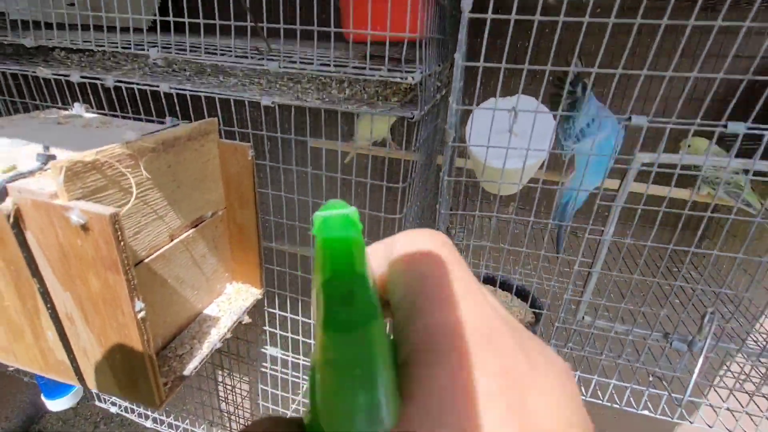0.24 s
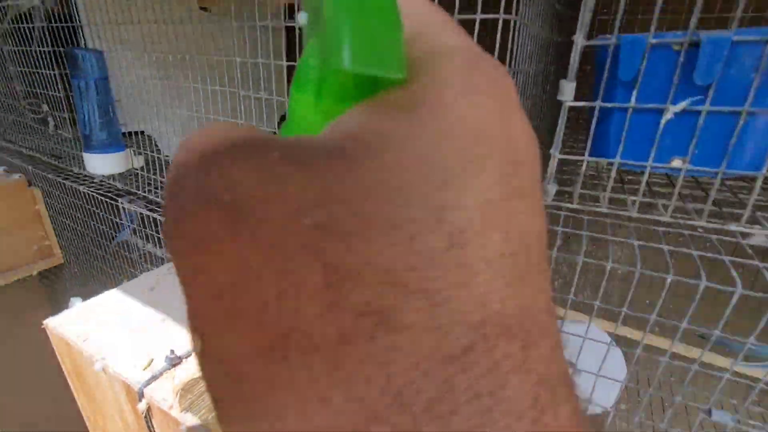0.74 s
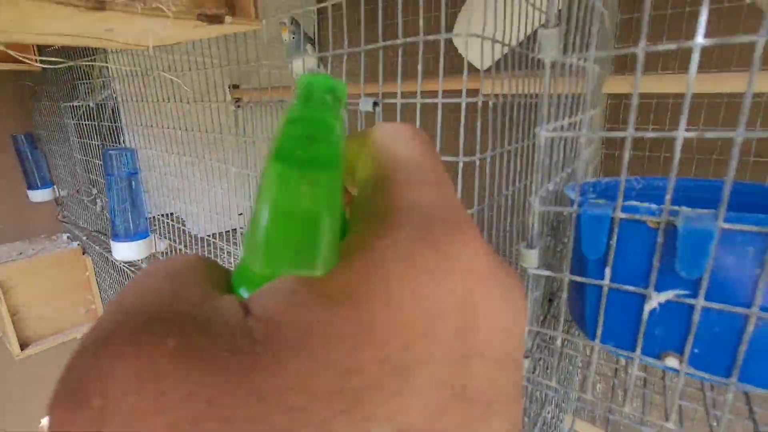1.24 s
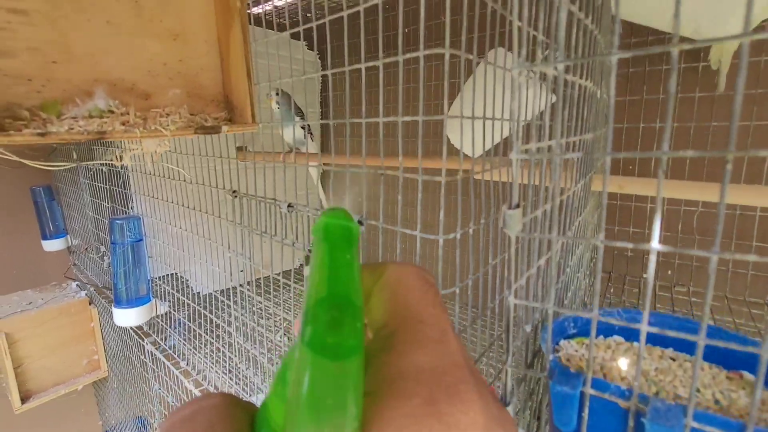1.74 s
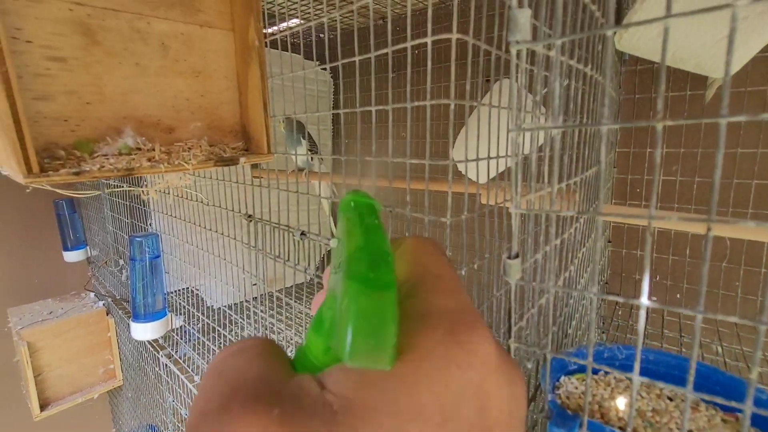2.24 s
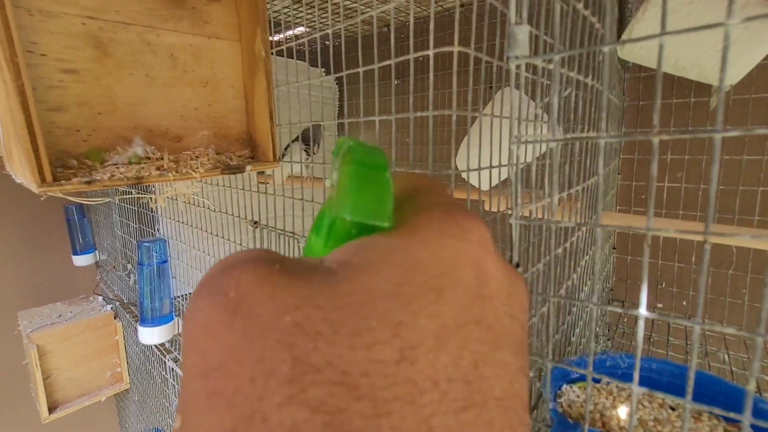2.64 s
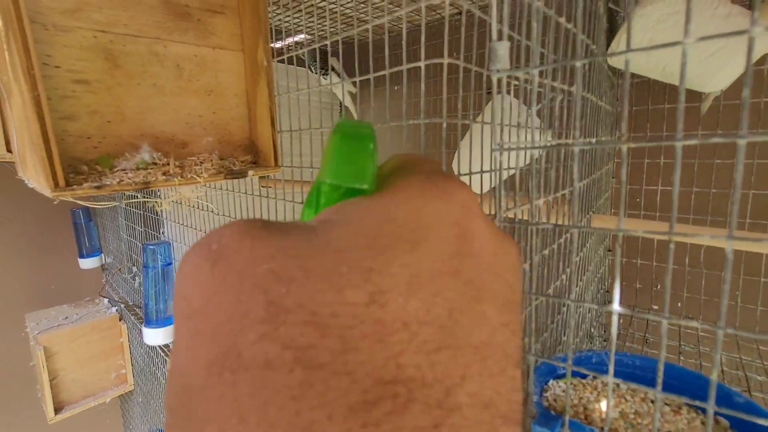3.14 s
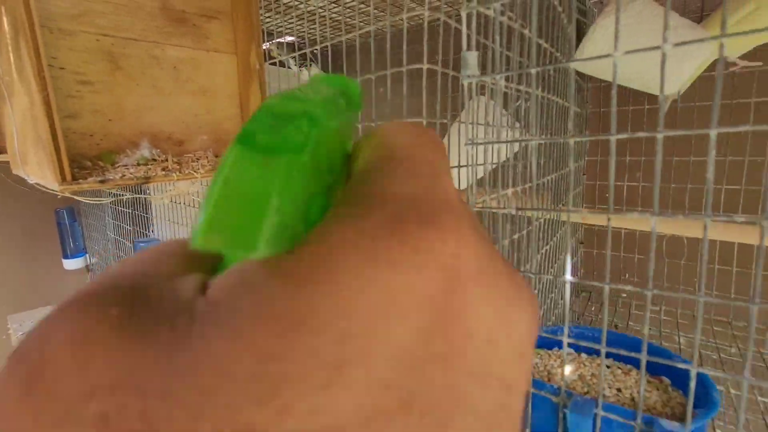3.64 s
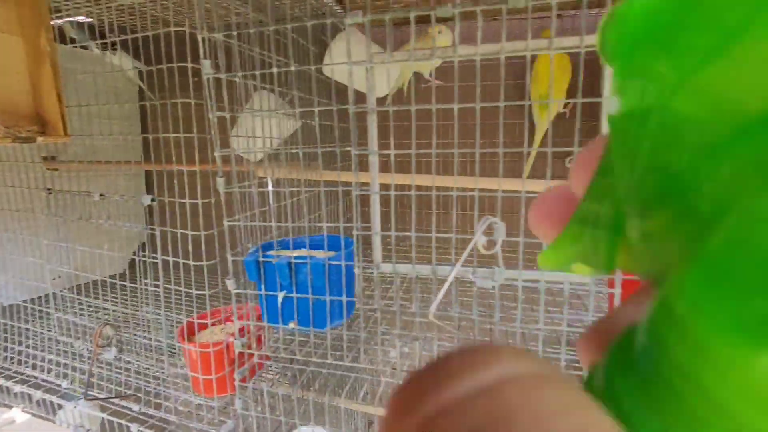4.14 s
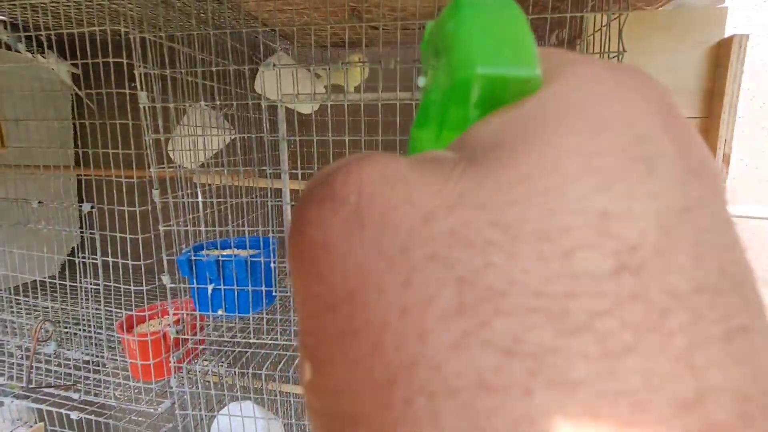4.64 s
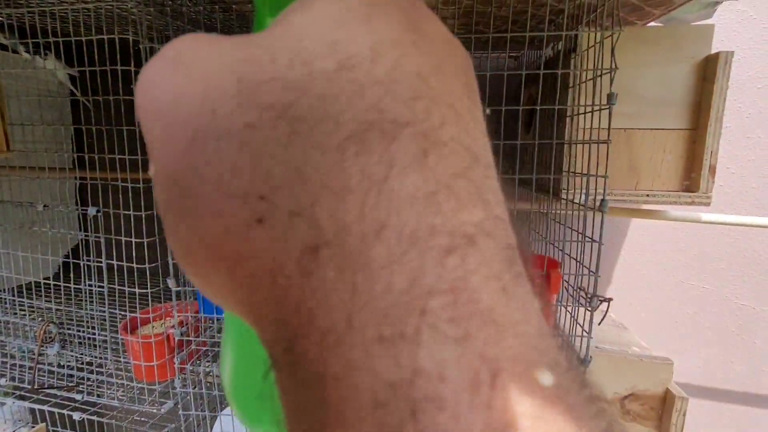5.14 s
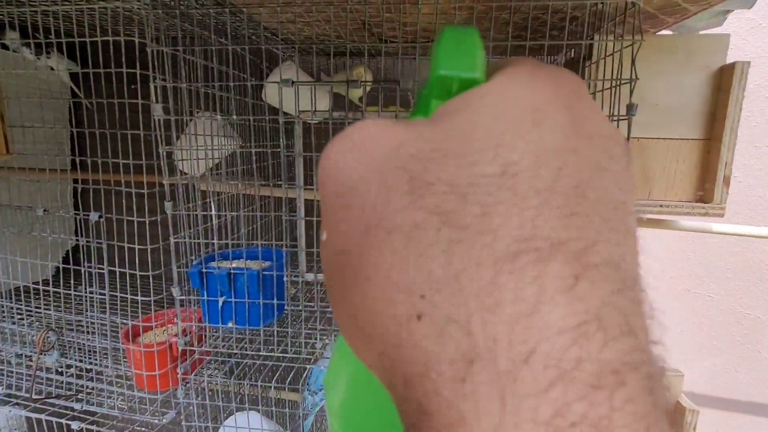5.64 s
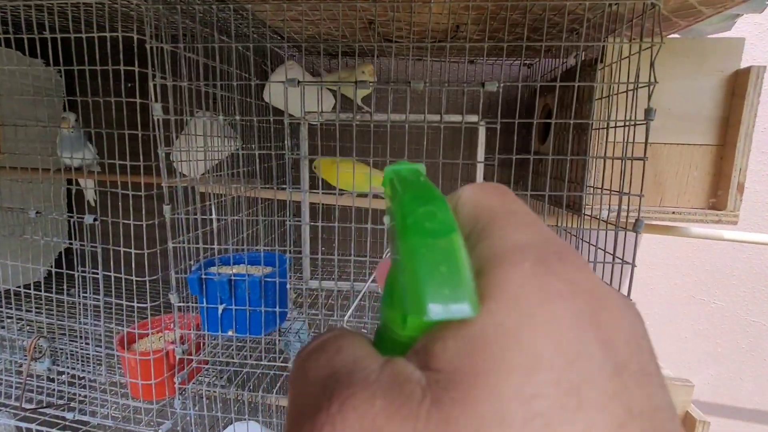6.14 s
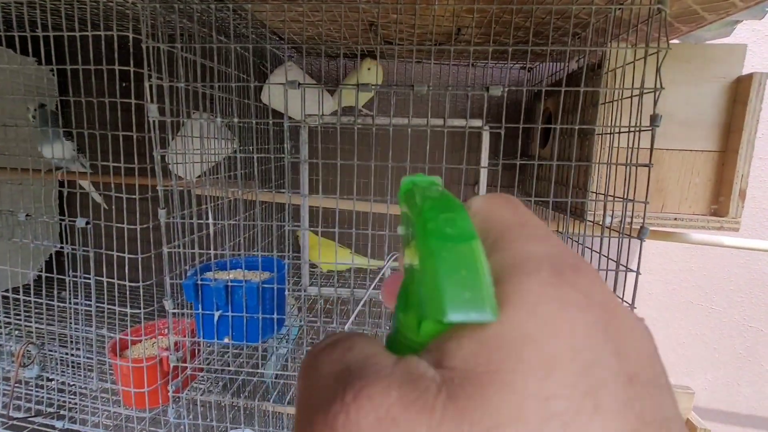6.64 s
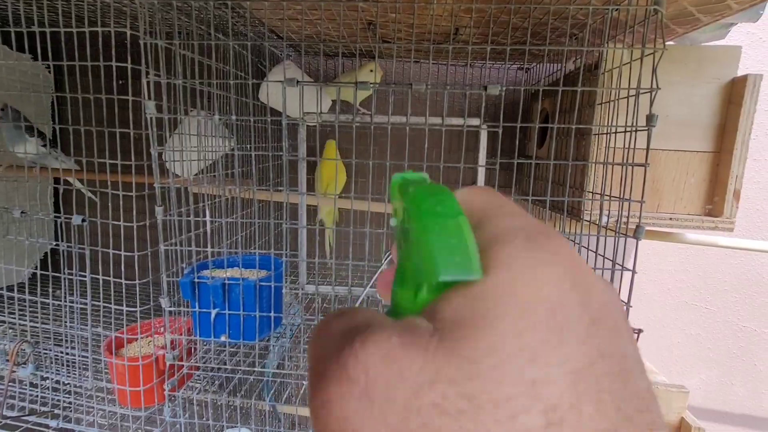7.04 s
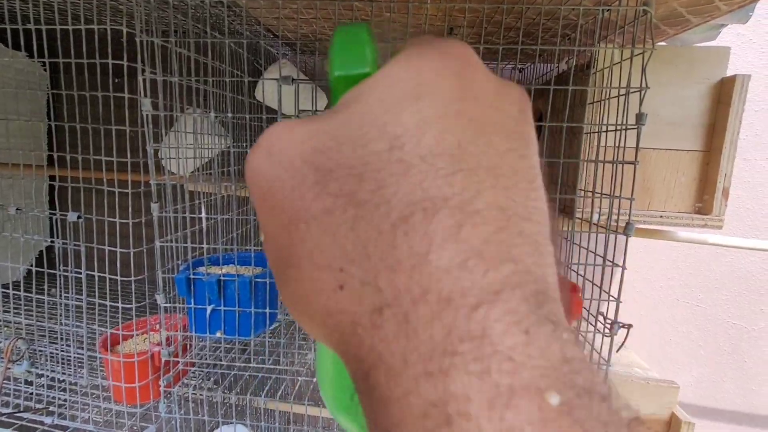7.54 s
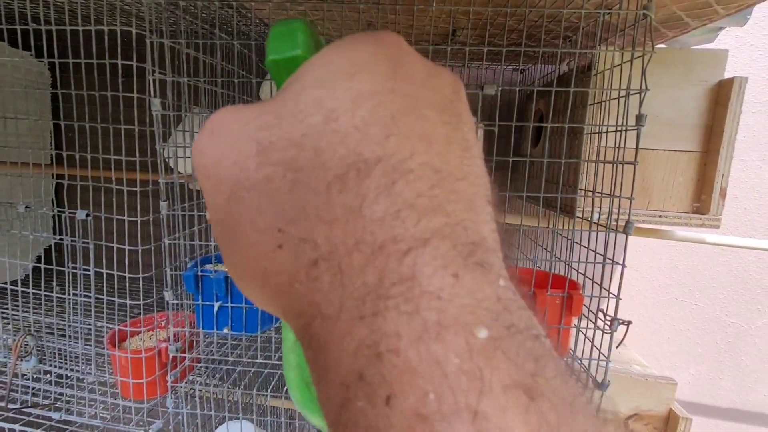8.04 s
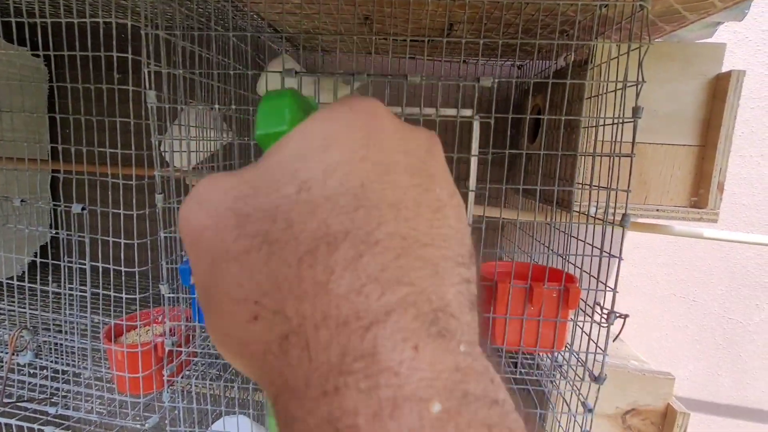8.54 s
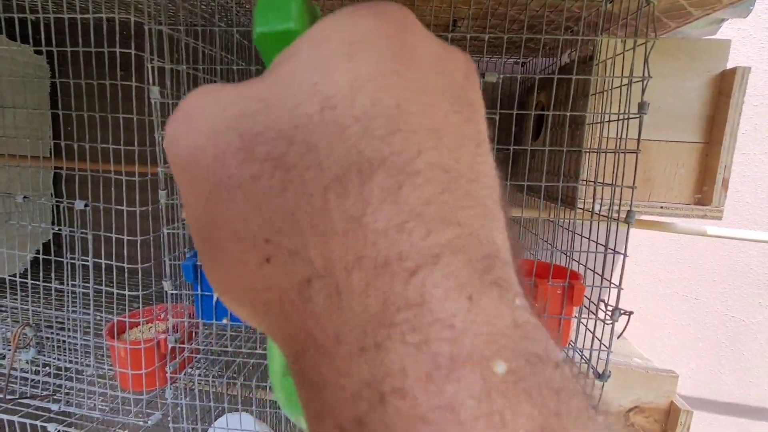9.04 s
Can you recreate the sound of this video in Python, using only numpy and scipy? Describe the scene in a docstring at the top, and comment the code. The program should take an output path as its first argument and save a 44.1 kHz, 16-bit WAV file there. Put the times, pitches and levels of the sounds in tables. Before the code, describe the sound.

Short sharp mist bursts and plastic ticks repeat close by, over budgerigar chirps near and far, soft wing flurries and faint outdoor air.

```python
"""A hand pumps a trigger spray bottle close by in an aviary: shaped noise for each squeeze hisses out mist,
then the trigger springs back and ticks, as short bright bursts of decaying noise.
Small parrots warble in quick stepped notes, sine whistles with a weak octave; farther ones blur in the shed's echo.
Wing flurries push air at the two microphone ports, as pulsing low noise, over open air whose treble wavers."""
import sys
import numpy as np
from scipy import signal
from scipy.fft import rfft, irfft, next_fast_len
from scipy.io import wavfile
from scipy.ndimage import uniform_filter1d, map_coordinates

SR = 44100
rng = np.random.default_rng(int(sys.argv[2]) if len(sys.argv) > 2 else 0)


def makeup_ratio(level_db):
    """Linear amplitude ratio for a level in decibels (20 dB per factor of ten)."""
    decades = np.asarray(level_db, float) / 20
    return 10 ** decades


def wav_out(sig):
    """Save sig, one row per channel (or a flat mono array), as 16-bit PCM at SR to the path in sys.argv[1]."""
    wavfile.write(sys.argv[1], SR, np.round(np.clip(np.atleast_2d(sig).T, -1, 1) * 32767).astype(np.int16))


N = 409688  # length in samples

# Squeezes of the trigger. Each row: start in seconds, trigger back on its stop in seconds,
# level of the tick's noise in dB before its resonance.
SQUEEZES = [(0.054, 0.364, -36), (0.966, 1.352, -34), (1.443, 1.83, -37), (1.912, 2.313, -30),
            (2.389, 2.737, -29), (2.799, 3.152, -32), (3.21, 3.542, -31), (3.607, 3.895, -35),
            (4.578, 4.905, -30), (5.009, 5.323, -32), (5.382, 5.724, -33), (5.796, 6.121, -35),
            (6.466, 6.834, -25), (6.889, 7.206, -38), (7.282, 7.6, -31), (7.666, 7.954, -33),
            (8.005, 8.294, -27), (8.33, 8.621, -26), (8.66, 8.959, -33), (9.009, 9.308, -33)]
# Spectrum of the mist. Each row: frequency in Hz, gain in dB.
MIST_SPECTRUM = [(1000, -22), (2500, -3.5), (8500, -13), (12000, -8), (16000, -12.5)]
# Nozzle resonance as the bottle is aimed about. Each row: time in seconds, level in dB re the hiss.
NOZZLE_LEVEL = [(.1, 4.5), (1.4, -1.5), (2.9, 2), (5.8, 4.5), (7.7, 3), (8.3, -1)]
HISS_DB = -31  # level of the mist from 9 to 15 kHz, before the squeeze's shape and the ports
RETURN_S = 0.12  # the spring brings the trigger back about this long after the valve shuts


def spray():
    """Turbulent jet noise: pressure swells the mist's hiss and nozzle ring while water rushes through the valve."""
    jet_level, nozzle_level, valve_level = np.zeros((3, N))
    for start_s, back_s, _ in SQUEEZES:
        length_s = back_s - RETURN_S - start_s
        k, shape = swell(start_s - .04, length_s + 0.069, sharp=2.2)
        jet_level[k] += makeup_ratio(HISS_DB) * shape
        nozzle_level[k] += makeup_ratio(HISS_DB + np.interp(start_s, *np.transpose(NOZZLE_LEVEL))) * shape
        # the valve opens and shuts quickly
        k, shape = swell(start_s - .005, length_s + 0.004, sharp=0.4)
        valve_level[k] += makeup_ratio(HISS_DB - 5.5) * shape
    drops = patchy(patch_db=2.0) * makeup_ratio(0.79 * wobble(300))  # droplets tear off unevenly
    mist = filtered(drops, lambda hz: makeup_ratio(along(MIST_SPECTRUM, hz)))
    mist = mist / np.std(filtered(mist[0], lambda hz: (hz > 9000) & (hz < 15000)))
    ring = unit(filtered(drops, lambda hz: peak(hz, 5320, 3850) ** 2))
    rush = unit(filtered(drops, lambda hz: peak(hz, 1480, 1170) + peak(hz, 2800, 3000) ** 2))
    flow = mist * jet_level + ring * nozzle_level + rush * valve_level
    return ports(*flow, lag_ms=0.2915)


GRIP_S, GRIP_DB = .014, -35  # the trigger clicks this long before the start as the finger takes up the slack
RATTLE_S, RATTLE_DB = 0.09, -4  # mean time before the stop, mean level re the tick


def ticks():
    """Impact excitation: the gripped trigger clicks; let go, the valve ball rattles and the trigger hits its stop."""
    out = np.zeros((2, N + SR))
    t = np.arange(SR // 50) / SR
    for start_s, back_s, db in SQUEEZES:
        timing, size = rng.uniform(-1, 1, 2)
        grip = (start_s - GRIP_S, GRIP_DB - 3 * size)
        rattle = (back_s - RATTLE_S * (1 + .1 * timing), db + RATTLE_DB + 3 * size)
        stop = (back_s, db)
        for s, crack_db in (stop, rattle, grip):
            first = round(s * SR)
            decay = makeup_ratio(crack_db - 60 * t / .014)  # falls 60 dB in 14 ms
            out[:, first:first + len(t)] += decay * rng.standard_normal((2, len(t)))
    return makeup_ratio([[-1.5], [1.5]]) * filtered(out[:, :N], lambda hz: peak(hz, 8000, 10000))


# Near birds' calls, each one whistle that steps from pitch to pitch. Each row: list of starts in seconds,
# list of notes (onset in ms into the call, nominal pitch in Hz, level in dB before tremor and port gains),
# end in ms into the call, share of the way that a note slides toward a lower next one.
CALLS = [([.083], [(13, 3740, -20), (35.96, 3000, -14), (46.1, 3650, -14), (79, 3140, -6.5),
         (92, 3490, -11), (115, 2510, -24), (147, 2040, -21), (158.2, 3500, -7.5), (174, 3100, -9)],
         184, .35), ([1.666], [(10, 3560, -12.5), (26.07, 2700, -19), (43.1, 3520, -10), (54, 2200, -17),
         (69.3, 3080, -7), (83, 3200, -8), (112, 2330, -21), (129, 2130, -21.5), (155.7, 3520, -11),
         (168, 3200, -17)], 181, .2), ([2.13], [(20, 3700, -27), (57, 1840, -20), (70, 3100, -25),
         (90.5, 3400, -14), (107, 2400, -15.5), (125.8, 1900, -15), (133.5, 3450, -17.5), (146, 2200, -23)],
         158, .3), ([3.08], [(6, 3950, -18), (17, 3700, -16.5), (29, 3000, -14.5), (41, 3600, -13.5),
         (53.3, 1800, -25.5), (67, 2900, -17), (82, 3320, -8), (99, 2550, -8.5), (129, 3500, -9.5),
         (154, 2100, -21), (165, 2880, -15)], 186, .22), ([4.185], [(0, 3100, -22), (14, 3650, -23),
         (26, 3040, -22), (36, 3650, -21), (49, 2750, -21.5), (66, 2950, -16), (85, 1900, -17.5)], 112, .6),
         ([4.506, 7.296, 9.131], [(0, 3350, -23), (17, 2950, -11), (28, 3580, -16), (41, 1880, -13),
         (59, 2830, -7), (72, 3450, -14), (82, 3270, -8), (102, 2420, -6.5), (123, 2030, -10.5),
         (137, 3320, -12), (153, 3050, -10)], 168, .15), ([6.285], [(13, 3250, -30), (40.3, 2400, -24.5),
         (62.6, 2200, -15), (80, 3100, -15.5), (114.4, 1780, -19), (136, 1950, -16), (146, 2600, -14.5),
         (160, 1310, -21)], 172, .3), ([7.812], [(0, 4200, -27), (21, 3500, -40), (44.4, 3460, -16.5)],
         58, .3)]
SLUR_S, SAG, ROUND = .003, .03, .55  # steps are slurred; pitch sag in a note, as a share; exponent of its swell
OUT_OF_STEP = 2.09  # mean phase between the ports, radians


def near_birds():
    """Frequency modulation: a hoarse stepped whistle with a weak octave, weaker and out of phase at the right port."""
    out = np.zeros((2, N))
    waver, tremor, turn = wobble(450), wobble(300), wobble(40)

    def slur(x):
        """Moving average: sudden steps become short ramps."""
        return uniform_filter1d(x, max(round(SLUR_S * SR), 2), mode="nearest")

    for starts, notes, end_ms, slide in CALLS:
        ms, hz, db = np.transpose(notes)
        edges = np.append(ms, end_ms)
        drop_to_next = np.minimum(np.append(np.diff(np.log(hz)), 0), 0)
        bend = slide * drop_to_next - SAG
        for s in starts:
            k = np.arange(round((s + ms[0] / 1000) * SR), min(round((s + end_ms / 1000) * SR), N))
            place = np.interp((k / SR - s) * 1000, edges, np.arange(len(edges)))
            note = np.minimum(place.astype(int), len(ms) - 1)
            within = place - note  # 0 to 1 through each note
            pitch = np.exp(slur(np.log(hz[note]) + bend[note] * (within ** 2 - .3)))
            level = slur(makeup_ratio(db[note]) * np.abs(np.sin(np.pi * within)) ** ROUND)
            level = level * makeup_ratio(2.7 * np.tanh(tremor[k]))
            phase = 2 * np.pi * np.cumsum(pitch * (1 + .018 * waver[k])) / SR
            phase = phase + [0 * k, OUT_OF_STEP + 0.35 * turn[k]]
            whistle = np.sin(phase) + makeup_ratio(-27) * np.sin(2 * phase)
            out[:, k] += level * makeup_ratio([[1.6], [-2.6]]) * whistle
    return out + makeup_ratio(-11) * echo(out[0], t60=0.12)


# Farther birds, one blurred phrase a row; chatter hops about its glide. Each row: start in seconds,
# length in ms, first and last pitch of the glide in Hz, mean syllable level in dB before ports and echo.
CHATTER = [(0, 90, 2900, 2500, -27), (.19, 150, 3100, 2950, -28), (.19, 170, 2150, 2150, -31),
           (.3, 140, 1800, 1550, -33), (.45, 100, 2800, 3200, -30), (1.469, 210, 2980, 2830, -30.5),
           (2.03, 120, 2700, 3000, -28.5), (2.55, 140, 2900, 3100, -31), (2.665, 90, 2550, 2600, -32),
           (3.81, 70, 3450, 3050, -35), (3.88, 170, 2950, 2700, -30.5), (3.93, 120, 1900, 2350, -37),
           (5.195, 85, 2800, 3100, -32), (5.47, 70, 2700, 3050, -29), (5.57, 80, 3000, 2700, -27),
           (5.77, 150, 3300, 2800, -28), (6.619, 195, 2750, 2700, -29), (7.73, 136, 3350, 2850, -31)]
# Whistles hold closer to their glide. Each row: start in seconds, length in ms, first and last pitch in Hz,
# mean syllable level in dB before ports and echo.
WHISTLES = [(.37, 100, 4500, 3950, -34), (.575, 40, 2200, 2150, -34), (.745, 160, 6800, 5900, -43),
            (1.99, 40, 4900, 3800, -29), (2.372, 35, 3600, 3480, -28), (3.9, 100, 4800, 4650, -38),
            (4.03, 135, 4150, 3950, -40), (5.72, 50, 4600, 3750, -35), (7.049, 140, 4100, 4030, -39),
            (8.45, 543, 1420, 1380, -45), (8.88, 45, 3570, 3530, -33)]
# shares of pitch: scatter about the glide in chatter and in whistles, fall within a syllable, quick waver
HOP, STRAY, FALL, RASP = .06, .015, .05, .028


def far_birds():
    """Reverberant blurring: broken runs of short, raspy, falling syllables, heard largely through the echo."""
    out = np.zeros(N)
    step_s = .011  # mean spacing of the syllables
    rasp = wobble(700)
    phrases = [(row, HOP) for row in CHATTER] + [(row, STRAY) for row in WHISTLES]
    for (start_s, ms, first_hz, last_hz, db), scatter in phrases:
        draws = rng.standard_normal((50, 4))
        count = int(np.clip(ms / 1000 / step_s, 1, len(draws)))
        for i, (late, off, size, long) in enumerate(draws[:count]):
            syllable_s = start_s + step_s * (i - .5 + .4 * late)
            k, shape = swell(syllable_s, 0.013 * np.exp(0.297 * long), sharp=0.4)
            hz = first_hz * (last_hz / first_hz) ** ((i + .5) / count) * (1 + scatter * off)
            fall = FALL * np.linspace(.5, -.5, len(k))
            phase = 2 * np.pi * np.cumsum(hz * (1 + fall + RASP * rasp[k])) / SR
            whistle = np.sin(phase) + makeup_ratio(-15) * np.sin(2 * phase)
            out[k] += makeup_ratio(db + 3.5 * size) * shape * whistle
    direct = makeup_ratio(-4.0) * out * [[1], [-1]]  # opposite in sign at the two ports
    return makeup_ratio([[1.5], [-2.5]]) * (direct + echo(out, t60=0.075))


# Wing flurries. Each row: middle in seconds, length in ms, thump level in dB before the wingbeat,
# feather rustle in dB re the thump.
WINGS = [(0.349, 410, -32, -4.5), (.88, 160, -44, -4), (3.511, 470, -36.5, -1), (5.233, 284, -34, -4),
         (6.133, 177, -32.5, -2), (8.37, 400, -43.5, -6)]


def wings():
    """Amplitude modulation: 18 beats a second pulse low pushes of air, nearly alike at both ports, and a rustle."""
    push_level, rustle_level = np.zeros((2, N))
    for middle_s, ms, db, rustle_db in WINGS:
        k, shape = swell(middle_s - ms / 2000, ms / 1000, sharp=1.4)
        beat = 1 + 0.37 * np.cos(2 * np.pi * 18 * (k / SR - middle_s))
        push_level[k] += makeup_ratio(db) * shape * beat
        rustle_level[k] += makeup_ratio(db + rustle_db) * shape * beat
    noise = rng.standard_normal((3, N))  # one shared, then one for each port
    push = unit(filtered(noise[0] + 0.36 * noise[1:], lambda hz: peak(hz, 74, 42) ** 2))
    rustle = filtered(noise[1:], lambda hz: peak(hz, 430, 690) ** 2 + 0.23 * peak(hz, 4200, 4000))
    return push * push_level + unit(rustle) * rustle_level


# Spectrum of the open air. Each row: frequency in Hz, gain in dB.
AIR_SPECTRUM = [(18, -60), (30, -4), (362, -9), (645, -1), (955, -17), (1150, -7), (4730, -8),
                (15800, -20.5)]
# Brief dips of the air's treble. Each row: middle in seconds, length in ms, change in dB.
TREBLE_DIPS = [(.655, 150, -8), (6.28, 90, -14)]


def aviary():
    """Broadband ambient noise: air, breeze, cage murmur; the treble's level wavers at random, with two brief dips."""
    high = lambda hz: 1 / (1 + (1500 / (hz + 1)) ** 4)  # treble share, half at 1500 Hz
    split = lambda hz: makeup_ratio(along(AIR_SPECTRUM, hz)) * np.array([[1 - high(hz)], [high(hz)]])
    both = filtered(patchy(patch_db=2.8), split)
    bass, treble = both / np.std(both.sum(0))
    treble_db = 2.4 * wobble(11)
    for middle_s, ms, db in TREBLE_DIPS:
        k, shape = swell(middle_s - ms / 2000, ms / 1000, sharp=1.2)
        treble_db[k] += db * shape
    return makeup_ratio(-42.5) * ports(*(bass + treble * makeup_ratio(treble_db)), lag_ms=0.032)


# The two microphone ports. Each row: frequency in Hz, left minus right in dB, likeness from 0 to 1.
PORTS = [(145, 0, 0.91), (600, 1.5, 0.073), (1950, 2.5, 0.092), (5800, 5.5, 0.16), (8700, -5.5, 0.43),
         (15000, -5, 0.25)]


def ports(x, other, lag_ms):
    """Interchannel coherence: the left hears x late, the right part x and part a different path."""
    alike = lambda hz: np.clip(along(PORTS, hz, axis=2), 0, 1)
    delay = lambda hz: np.exp(-2j * np.pi * hz * lag_ms / 1000)
    mix = lambda hz: np.array([alike(hz), np.sqrt(1 - alike(hz) ** 2)])
    left = filtered(x, lambda hz: makeup_ratio(along(PORTS, hz) / 2) * delay(hz))
    right = filtered(np.array([x, other]), lambda hz: makeup_ratio(-along(PORTS, hz) / 2) * mix(hz))
    return np.array([left, right.sum(0)])


def echo(x, t60, channels=2):
    """Diffuse reverberation: the shed's tail is noise decaying 60 dB in t60 seconds, a new one for each port."""
    t = np.arange(SR // 3) / SR
    tail = rng.standard_normal((channels, len(t))) * makeup_ratio(-60 * t / t60) * (t > .003)
    return signal.fftconvolve(np.atleast_2d(x), tail / np.linalg.norm(tail[0]), axes=1)[:, :N]


def patchy(patch_db):
    """Nonstationary noise: two noises whose level drifts alike in patches of time and frequency."""
    z = signal.stft(rng.standard_normal((2, N)), nperseg=512)[2]
    field = uniform_filter1d(rng.standard_normal(z.shape[1:]), 8, 0)
    field = uniform_filter1d(field, 16, 1)
    return signal.istft(z * makeup_ratio(patch_db * unit(field)), nperseg=512)[1][:, :N]


def peak(hz, centre_hz, width_hz):
    """Resonance: the causal response of a damped oscillator, 1 at its centre."""
    return 1j * hz * width_hz / (centre_hz ** 2 - hz ** 2 + 1j * hz * width_hz)


def filtered(x, response):
    """Linear filtering: the spectrum of x times a response of frequency."""
    m = next_fast_len(N + 8192)
    return irfft(rfft(x, m) * response(np.fft.rfftfreq(m, 1 / SR)), m)[..., :N]


def along(points, hz, axis=1):
    """Logarithmic frequency scale: a column of (Hz, ..) points interpolated on it."""
    p = np.transpose(points)
    return np.interp(np.log(hz + 1), np.log(p[0] + 1), p[axis])


def swell(start_s, length_s, sharp):
    """Amplitude envelope: sample indices and a half sine to the power sharp over them."""
    first, n = round(start_s * SR), max(round(length_s * SR), 2)
    k = np.arange(max(first, 0), min(first + n, N))
    return k, np.abs(np.sin(np.pi * (k - first) / n)) ** sharp


def wobble(rate):
    """Random modulation: normal draws, rate a second, joined by straight lines."""
    knots = rng.standard_normal(int(N * rate / SR) + 4)
    return map_coordinates(knots, [np.arange(N) * rate / SR], order=1)


def unit(x):
    """Power normalization: scales to rms 1."""
    return x / np.sqrt(np.mean(x ** 2) + 1e-20)


def scene():
    """Superposition: the pressures of all sources add at the two ports."""
    return spray() + ticks() + near_birds() + far_birds() + wings() + aviary()


def low_pass(x):
    """Removes everything above the highest recorded frequency."""
    return signal.sosfilt(signal.butter(12, 16110, fs=SR, output="sos"), x)


def record(dry):
    """Signal chain: the two ports' sum of sources is the finished mix, passed on at unchanged level."""
    return low_pass(dry)


dry = scene()
out = record(dry)
wav_out(out)
```